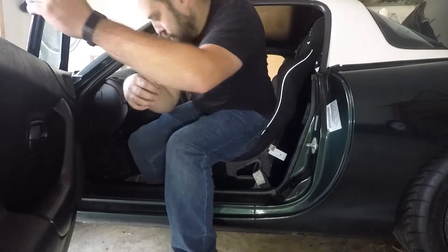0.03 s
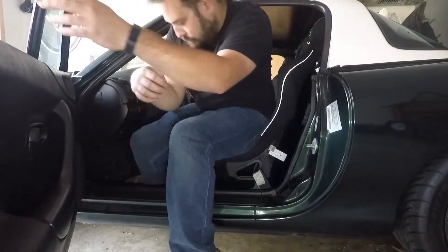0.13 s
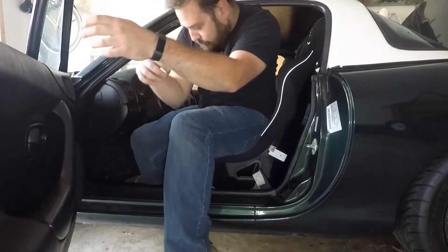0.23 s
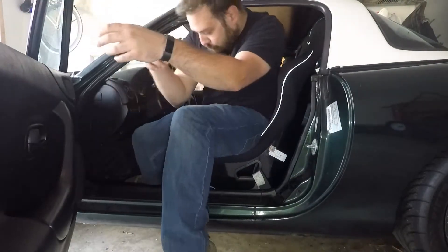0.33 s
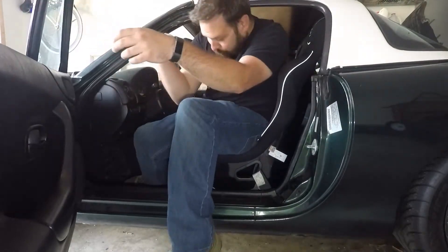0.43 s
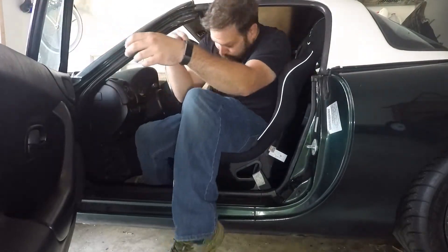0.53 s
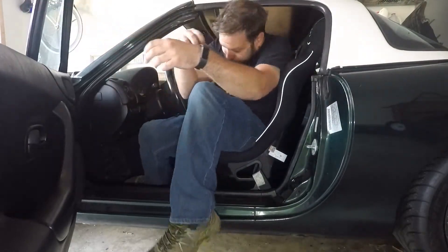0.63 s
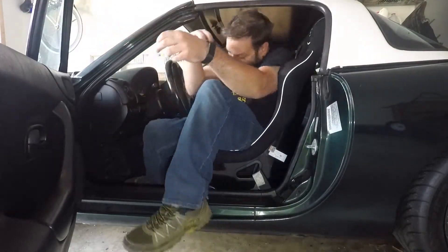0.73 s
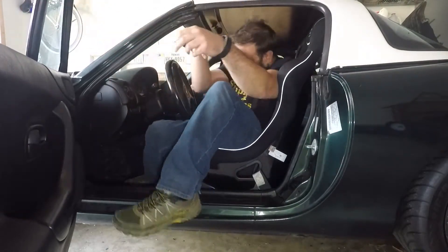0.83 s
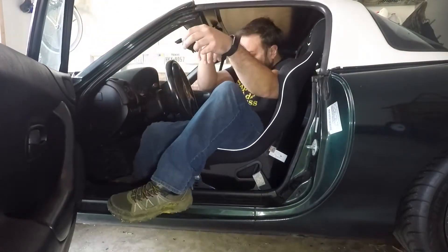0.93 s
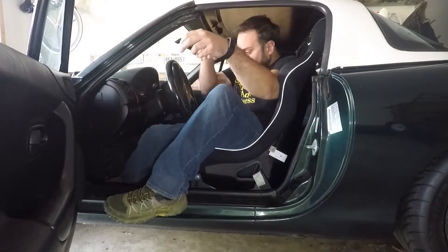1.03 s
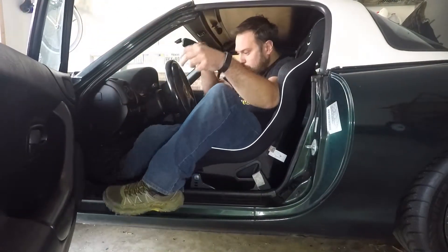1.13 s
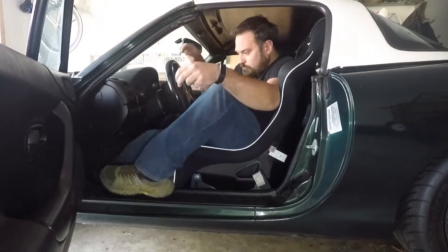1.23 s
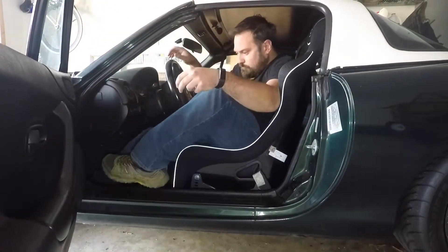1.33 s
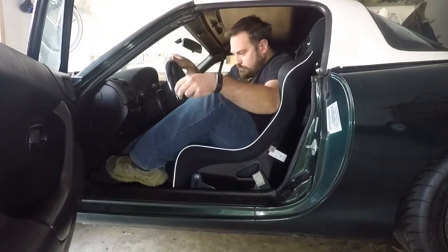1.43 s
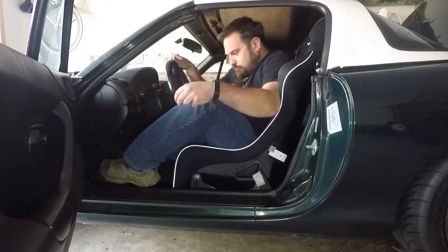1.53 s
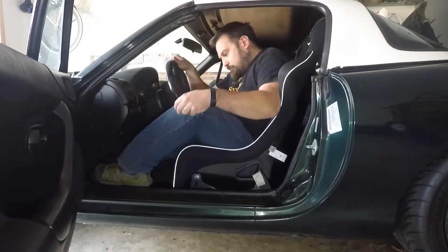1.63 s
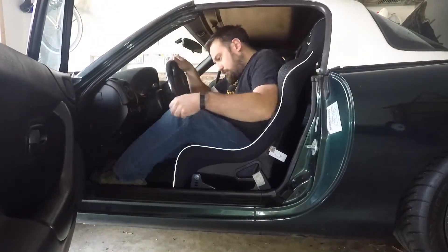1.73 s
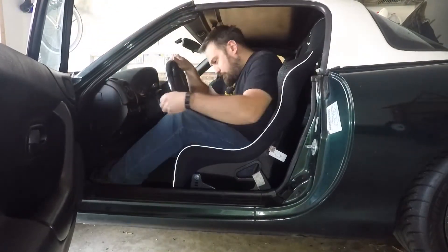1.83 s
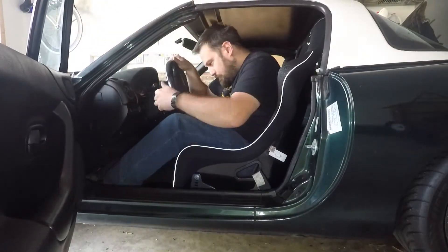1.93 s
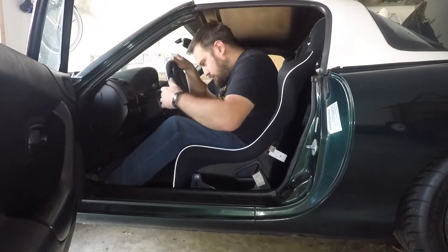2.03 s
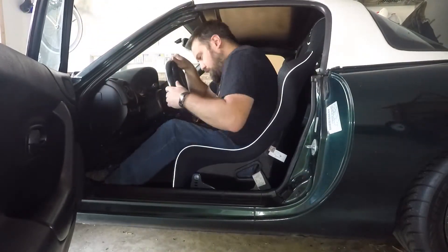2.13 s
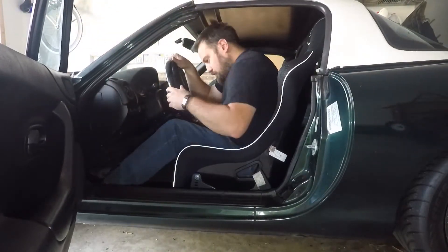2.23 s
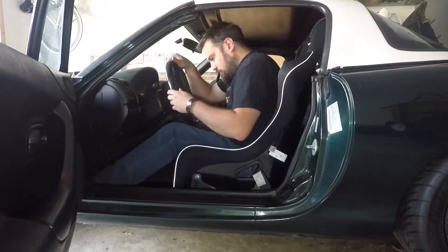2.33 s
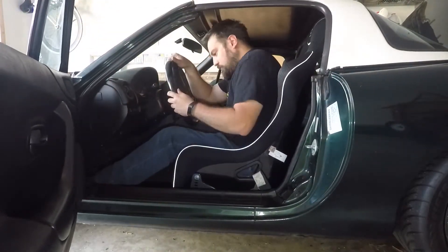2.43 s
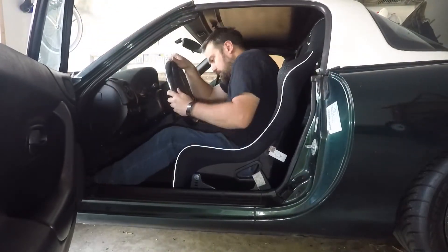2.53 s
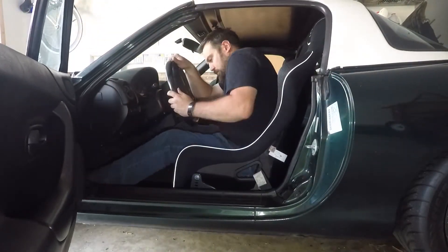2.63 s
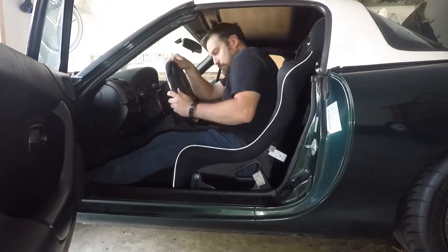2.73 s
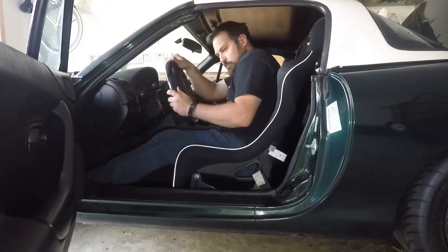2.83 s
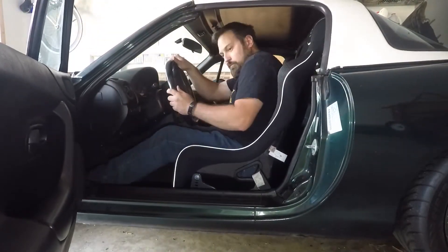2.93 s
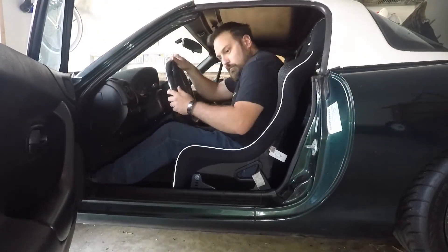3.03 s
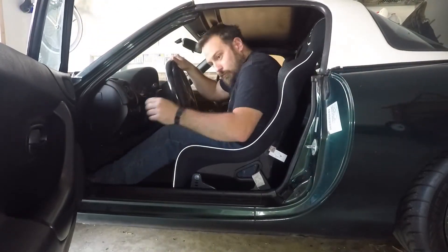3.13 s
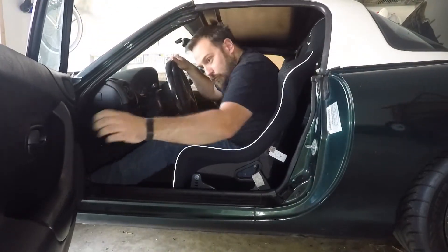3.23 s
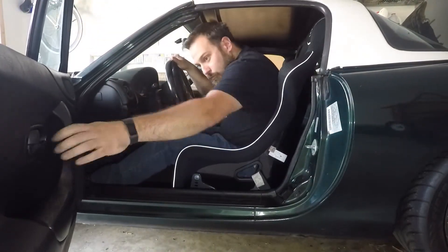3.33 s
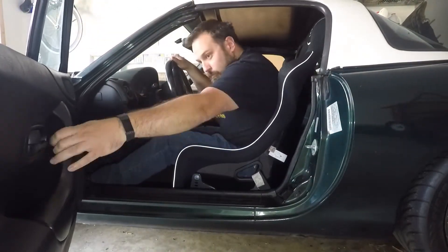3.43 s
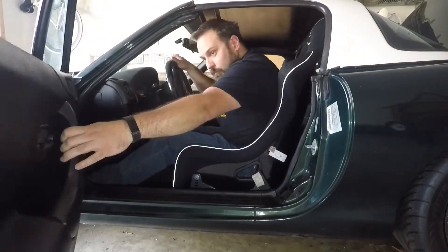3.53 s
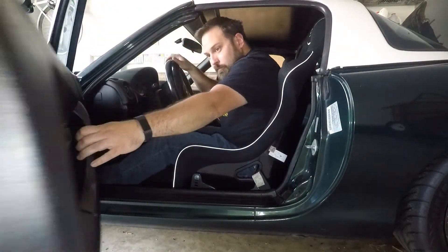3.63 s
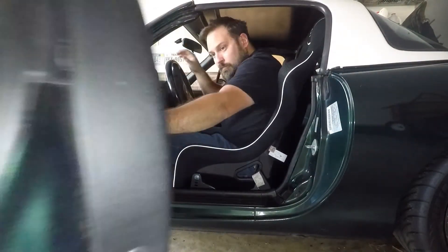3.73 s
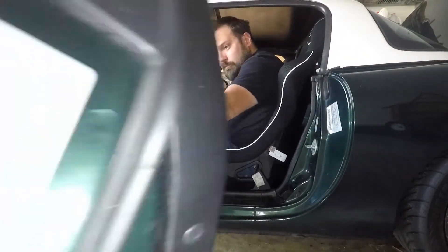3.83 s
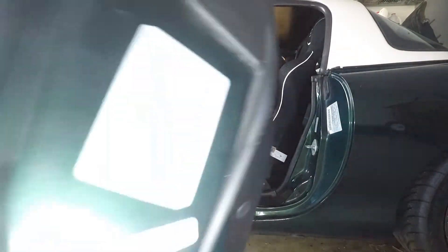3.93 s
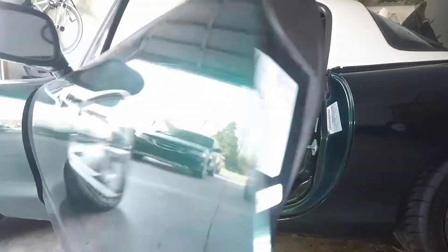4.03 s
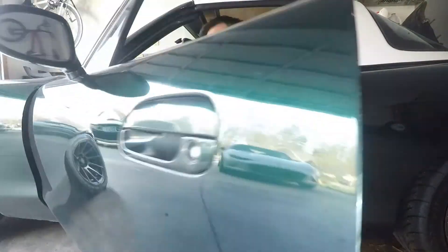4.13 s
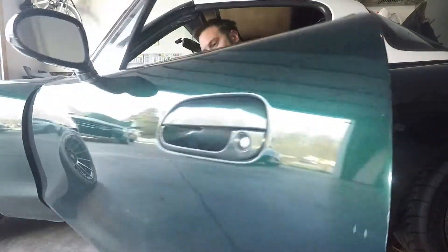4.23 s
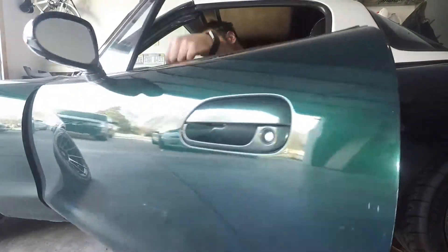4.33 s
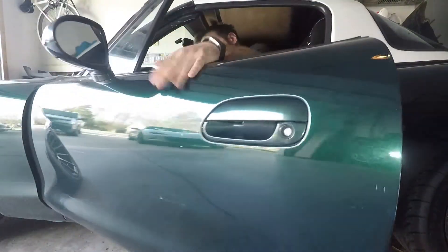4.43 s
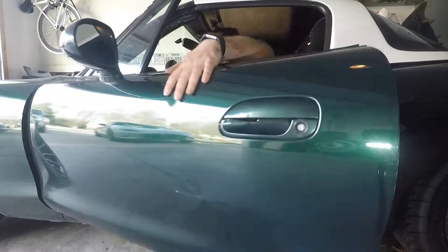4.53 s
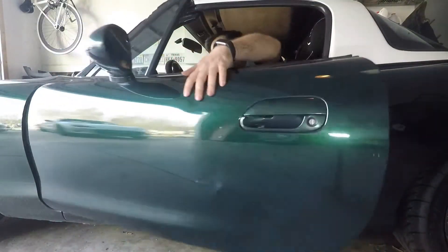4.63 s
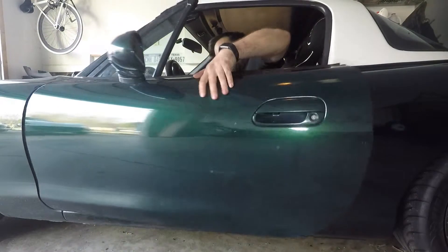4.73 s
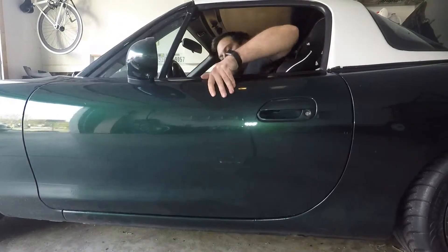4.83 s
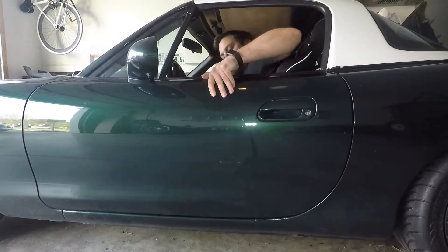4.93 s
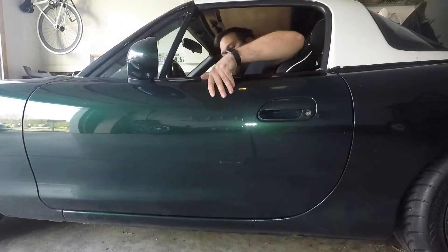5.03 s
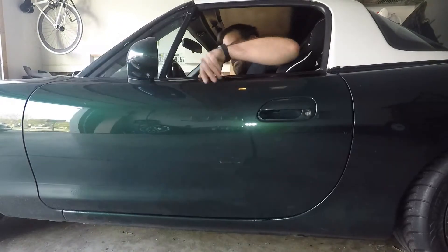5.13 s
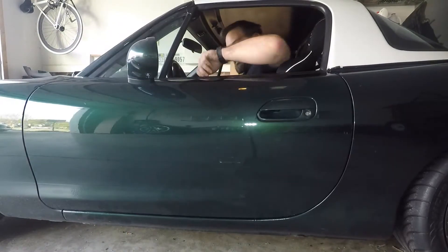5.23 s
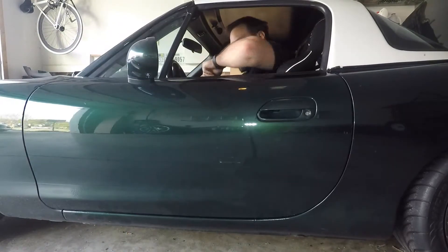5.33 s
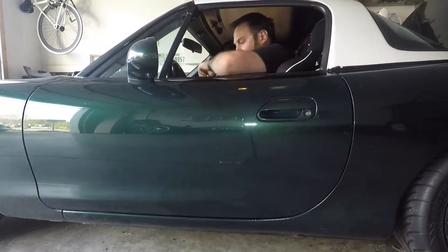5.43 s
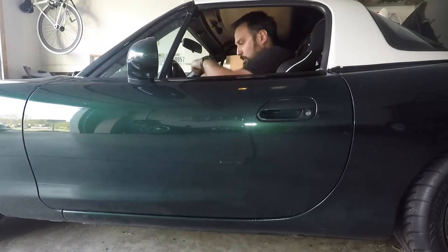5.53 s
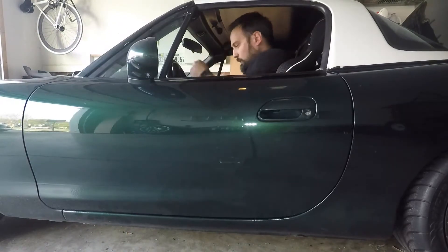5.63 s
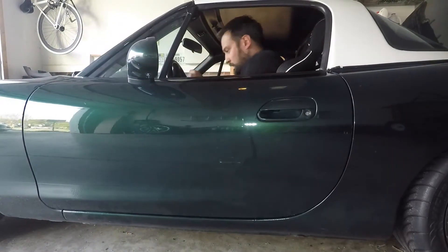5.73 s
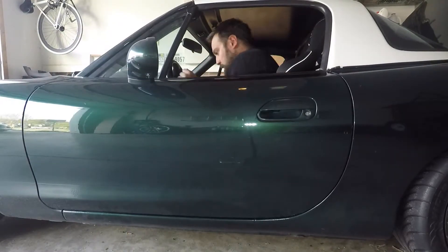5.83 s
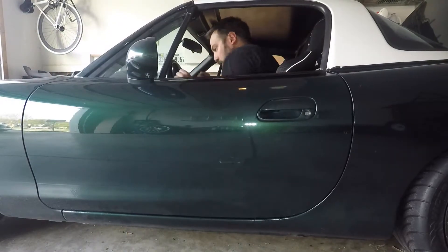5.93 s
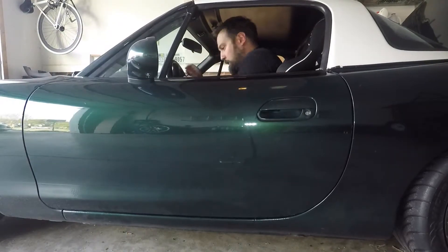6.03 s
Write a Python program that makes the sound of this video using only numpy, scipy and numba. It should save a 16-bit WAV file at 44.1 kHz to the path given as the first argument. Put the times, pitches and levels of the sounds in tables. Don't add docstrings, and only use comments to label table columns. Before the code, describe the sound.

In an open garage, a distant helicopter thumps and hums steadily under soft air hiss. Close by, a person slides into a car seat with cloth rustles, shoe scuffs, hollow knocks and small clicks. After a flurry of bright ticks, the door seal squeaks briefly and the door slams hard, metal rattling, with bare walls echoing. A small camera near the floor hears it in stereo.

```python
import sys
import numpy as np
from scipy import signal
from scipy.fft import rfft, irfft
from scipy.io import wavfile
from scipy.ndimage import uniform_filter1d
from numba import njit

SR = 44100
rng = np.random.default_rng(int(sys.argv[2]) if len(sys.argv) > 2 else 0)


def unload_audio(sound):
    columns = np.transpose(np.atleast_2d(sound))
    steps = np.round(np.clip(columns, -1, 1) * 32767)
    wavfile.write(sys.argv[1], SR, steps.astype(np.int16))


def convert_level_to_amplitude(level_db):
    exponent = np.asarray(level_db, float) / 20
    return 10 ** exponent


N = 267907
TIME = np.arange(N) / SR

# pitch_hz, side_minus_mid_db
PORT_SIDE = [(60, -24), (110, -7), (200, -11), (370, -7.5), (690, 4), (1270, 0.5), (2330, -1.5), (4290, -5),
             (7900, 2.5), (14500, -4.5)]


def on_log(table, hz):
    pitches, values = np.transpose(table)
    return np.interp(np.log(hz + 1), np.log(pitches), values)


def colour(x, table):
    hz = np.fft.rfftfreq(x.shape[-1], 1 / SR)
    return irfft(rfft(x) * convert_level_to_amplitude(on_log(table, hz)), x.shape[-1])


def band(x, lo_hz, hi_hz, order=2):
    y = signal.sosfilt(signal.butter(order, [lo_hz, hi_hz], "bandpass", fs=SR, output="sos"), x)
    return y / np.std(y)


def half_octaves(x):
    spectrum, hz = rfft(x), np.fft.rfftfreq(x.shape[-1], 1 / SR)
    for step in range(18):
        share = np.clip(1 - np.abs(2 * np.log2((hz + 1) / 40) - step), 0, 1)
        yield 40 * 2 ** (step / 2), irfft(spectrum * share, x.shape[-1])


def even(x):
    spectrum = rfft(x)
    width = int(160 * len(x) / SR)
    power = uniform_filter1d(np.abs(spectrum) ** 2, width)
    return irfft(spectrum / np.sqrt(power + 1e-12), len(x))


def walk(rate):
    k = int(SR / rate)
    held = np.repeat(rng.standard_normal(N // k + 1), k)
    drift = uniform_filter1d(uniform_filter1d(held, k), k)[:N]
    return drift / np.std(drift)


def diffuse(size, side_db):
    mid, side = rng.standard_normal((2, size))
    side = colour(side, side_db)
    return np.array([mid + side, mid - side])


def ports(x, pan_db, lag):
    return np.array([x * convert_level_to_amplitude(pan_db / 2), np.roll(x, lag) * convert_level_to_amplitude(-pan_db / 2)])


def near(hz, centre_hz, octaves):
    return 1 / (1 + (np.log2(hz / centre_hz) / octaves) ** 2)


def ring(modes, push_s, size):
    t = np.arange(size) / SR
    y = sum(g * np.sin(2 * np.pi * f * t) * np.exp(-np.log(1000) * t / t60) for f, g, t60 in modes)
    y = np.convolve(y, np.hanning(int(push_s * SR) + 3))[:size]
    return y / np.abs(y).max()


def add(out, x, s):
    i = int(s * SR)
    out[..., i:i + x.shape[-1]] += x[..., :N - i]


def strokes(rows):
    power = 0
    for s, swell, fade, db in rows:
        away = np.where(TIME < s, (s - TIME) / swell, (TIME - s) / fade)
        power = power + convert_level_to_amplitude(db - 20 * np.minimum(away, 9) ** 1.3) ** 2
    return power


def helicopter():
    # time_s, turns_hz
    shaft = [(0, 26.66), (1.5, 26.34), (2.4, 26.04), (3.4, 26.14), (4.4, 26.2), (6.07, 26.53)]
    # multiple_of_shaft, level_db
    orders = [(1, -45), (2, -16), (3, -21), (4, 0.5), (5, -25), (6, 1), (7, -14), (8, 5), (9, -9.5),
              (10, -33), (11, -37), (12, 1.5), (13, -16.5), (14, -12), (16, -11.5), (17, -17), (18, -27),
              (20, -17)]
    # time_s, low_lines_db, upper_lines_db
    hum = [(0, -51, -49.5), (.3, -46, -91), (0.58, -47.5, -84), (.7, -47, -55.5), (1, -42.5, -58),
           (1.4, -48.5, -59.5), (1.9, -49, -53), (2.3, -45.5, -53.5), (2.9, -46.5, -58), (3, -41, -51),
           (3.4, -46, -58), (3.799, -46, -60), (4.05, -49.5, -50), (4.5, -48.5, -48.5), (4.7, -46.5, -44.5),
           (5.3, -49, -49.5), (6.07, -45.5, -43.5)]
    # time_s, depth_db
    hum_fades = [(.39, -4.5), (0.601, -9.5), (.83, -4.5), (1.08, -8), (1.93, -2.5), (2.49, -4.5),
                 (2.72, -6), (3.08, -5.5), (3.28, -8), (5.37, -3.5), (5.569, -4.5)]
    blade_first_s, blade_period_s, fade_s = .0786, .10241, 0.0668

    count = int((N / SR - blade_first_s) / blade_period_s) + 1
    t = np.arange(-400, 2400) / SR
    push = np.exp(-(t / .0027) ** 2)
    pull = .55 * np.exp(-((t - .009) / .005) ** 2)
    blades = np.zeros(N)
    for k, db in enumerate(0.68 * rng.standard_normal(count)):
        add(blades, convert_level_to_amplitude(-29.0 + db) * (push - pull), blade_first_s + k * blade_period_s + t[0])

    turn = 2 * np.pi * np.cumsum(np.interp(TIME, *np.transpose(shaft))) / SR
    s, low_db, upper_db = np.transpose(hum)
    low = np.interp(TIME, s, low_db)
    for at, db in hum_fades:
        low = low + db * np.exp(-((TIME - at) / fade_s) ** 2)
    upper = np.interp(TIME, s, upper_db) + 3.5
    tail = 0
    for k, db in orders:
        level = db + (upper if 9.5 < k < 14.5 else low) + 1.82 * walk(4.853)
        tail = tail + convert_level_to_amplitude(level) * np.sin(k * turn + 0.57 * walk(3.16))

    rumble = convert_level_to_amplitude(-50.0 + 2 * walk(4.7)) * band(rng.standard_normal(N), 31, 110)
    return ports(blades + tail + rumble, 0., lag=5.3)


def air():
    # pitch_hz, level_db_per_hz
    hiss = [(76, -31), (130, -1), (214, -5.5), (266, -4.5), (331, -7.5), (411, -16), (875, -24),
            (1620, -24), (2510, -29), (3580, -27), (6500, -30), (10100, -39.5), (11300, -46.5),
            (14100, -49), (15200, -62)]
    # time_s, level_db
    swell = [(0, -2), (.15, 1.5), (.45, 1), (1.5, 1.5), (2.5, 3.5), (3.5, 3.5), (4.7, 4), (5.3, 1.5),
             (5.7, 5), (6.07, 3.5)]
    x = colour(diffuse(N, PORT_SIDE), hiss)
    return x / np.std(x) * convert_level_to_amplitude(-45 + np.interp(TIME, *np.transpose(swell)) + .5 * walk(2.72))


def insects():
    # peak_s, swell_s, fade_s, level_db, pitch_hz
    phrases = [(2.46, .15, .12, -52, 3130), (2.72, .08, .11, -56, 3050), (3.12, .15, .3, -57, 2900),
               (3.2, .2, .15, -58, 3300), (3.45, .3, .3, -59, 3250), (3.78, .4, .45, -57, 3290),
               (3.9, .28, .25, -59, 2890), (4.03, .6, .5, -58, 4740), (3.85, .3, .3, -60, 3720),
               (4.2, .3, .2, -59, 3650), (4.25, .3, .2, -61, 5850), (4.25, .25, .2, -59, 3230)]
    whine_hz, width_hz, waver = 9520, 200, .01
    out = convert_level_to_amplitude(-75) * band(diffuse(N, PORT_SIDE), .99 * whine_hz, 1.01 * whine_hz)
    for s, swell, fade, db, hz in phrases:
        sway = uniform_filter1d(rng.standard_normal((2, N)), int(SR / width_hz), axis=1)
        sway[1] = 0.67 * sway[0] + 0.64 * sway[1]
        pitch = hz * (1 + waver * walk(9))
        tone = np.sin(2 * np.pi * np.cumsum(pitch) / SR) * sway / np.std(sway)
        out = out + .9 * convert_level_to_amplitude(1.2 * walk(20)) * np.sqrt(strokes([(s, swell, fade, db)])) * tone
    return out


def rubbing():
    # peak_s, swell_s, fade_s, level_db, brightness_db_per_range
    scuffs = [(0.01, 0.37, 0.21, -46.5, -0.5), (.7, 0.36, 0.9, -60, -7.5), (.97, 0.18, 0.026, -55, -2),
              (1.17, 0.17, 0.17, -44.5, -1), (1.39, 0.14, 0.206, -50.5, -1), (1.6, 0.23, 0.18, -45.5, 0),
              (1.85, 0.092, 0.134, -47.5, -1.5), (2.06, 0.15, 0.16, -44, -1),
              (2.22, 0.076, 0.23, -50, -2.5), (2.64, 0.14, 0.23, -51, -6), (3.26, 0.14, 0.067, -51, -1.5),
              (3.36, 0.2, 0.108, -55.5, -7.5), (3.44, .1, 0.19, -54, 0), (4.376, 0.025, 0.136, -43.5, 2),
              (4.48, .1, 0.32, -55.5, 2), (4.735, 0.13, 0.04, -49.5, -0.5)]
    # peak_s, swell_s, fade_s, level_db
    seat = [(.84, 0.17, 0.29, -41.5), (1.24, 0.15, 0.088, -50), (2.06, .08, 0.108, -46),
            (2.14, 0.14, 0.14, -48), (3.25, 0.067, 0.11, -49), (3.35, .04, .08, -49),
            (3.42, 0.091, 0.088, -47), (4.71, .05, .06, -46), (.13, 0.13, 0.19, -55)]
    # peak_s, swell_s, fade_s, level_db
    cloth = [(.28, .4, 0.12, -51), (.52, 0.16, .15, -45.5), (.63, 0.3, 0.33, -39), (.87, 0.43, 0.22, -47.5),
             (2.06, 0.059, 0.13, -48), (2.33, 0.22, 0.23, -51), (2.66, 0.23, 0.17, -44.5),
             (2.85, 0.25, 0.11, -51.5), (3.16, 0.23, .15, -57)]
    # peak_s, swell_s, fade_s, level_db
    rustles = [
        (.56, 0.12, 0.29, -58),
        (.74, 0.33, 0.265, -41.5),
        (1.68, 0.25, 0.098, -52),
        (3.25, 0.077, 0.11, -50),
        (4.355, 0.067, .05, -47),
    ]
    # peak_s, swell_s, fade_s, level_db
    weave = [
        (.63, 0.23, 0.24, -42.5),
        (.87, .2, 0.22, -53),
        (2.33, 0.24, 0.16, -54),
        (2.66, 0.2, 0.28, -52),
    ]
    fidget = (-71.5, -67, -88, -67)
    unevenness = (3, 2, 1.5, 1.5)
    ranges_hz = [(250, 620), (720, 1340), (1400, 2005), (2200, 8150)]
    fidget_end_s = 4.2

    out, slides = 0, [0, strokes(seat), strokes(cloth), strokes(rustles)]
    for k, (lo, hi) in enumerate(ranges_hz):
        tilted = [(s, swell, fade, db + bright_db * (k - 3 / 2)) for s, swell, fade, db, bright_db in scuffs]
        gain = np.sqrt(strokes(tilted) + slides[k] + convert_level_to_amplitude(fidget[k]) ** 2 * (TIME < fidget_end_s))
        catches = np.minimum(rng.exponential(size=N), 8.0)
        grains = diffuse(N, PORT_SIDE) * convert_level_to_amplitude(unevenness[k] * catches + 1.26 * walk(90))
        out = out + band(grains, lo, hi, order=3) * gain * convert_level_to_amplitude(0.5)
    return out + band(diffuse(N, PORT_SIDE), 1900, 3700) * np.sqrt(strokes(weave))


def garage(x):
    # pitch_hz, t60_s
    decay = [(60, 0.48), (200, 0.62), (500, 0.98), (1300, 1.137), (1900, 1.03), (2500, 1.05), (3500, 0.91),
             (6000, 0.76), (9000, 0.78), (13000, 0.37)]
    # pitch_hz, side_minus_mid_db
    echo_side = [(60, -32), (110, -33), (200, -28), (370, -18.5), (690, -2), (1270, 1), (2330, -1.5),
                 (4290, -8.5), (7900, 4), (14500, 2.5)]
    t = np.arange(int(1.3 * SR)) / SR
    echo = 0
    for hz, part in half_octaves(diffuse(len(t), echo_side)):
        echo = echo + part * np.exp(-np.log(1000) * t / on_log(decay, hz))
    echo = echo * (1 - np.exp(-t / 0.0037))
    return signal.fftconvolve(x[None], echo / np.sqrt(np.sum(echo ** 2) / 2), axes=1)[:, :N]


def touch(t, bounce_s, share=.26):
    return (t == 0) + share * rng.standard_normal(len(t)) * np.exp(-t / bounce_s)


def knocks():
    # pitch_hz, t60_s
    cabin = [(155, 0.065), (185, 0.11), (215, 0.065), (250, 0.13), (300, 0.029), (365, 0.081), (440, 0.031),
             (530, 0.0865), (640, 0.079)]
    # time_s, thud_db, trim_knock_db, thud_hz
    thuds = [(0.05, -44.5, -35, 219), (0.272, -43, -44, 214), (0.759, -35, -35, 210),
             (0.799, -34.5, -33, 284), (1.157, -27.5, -30.5, 241), (1.174, -23, -28.5, 212),
             (1.581, -23.5, -35, 212), (1.587, -30, -28, 196), (1.799, -30, -38, 241.4),
             (1.825, -29.5, -40, 239), (1.839, -31.5, -29.5, 236), (2.05, -48, -32, 500),
             (2.091, -36.5, -34, 403), (2.174, -27, -35.5, 336), (2.234, -34, -36, 217),
             (2.29, -37, -51, 243), (2.558, -30.5, -33.5, 417), (2.614, -25.5, -36, 450),
             (2.655, -26, -50, 169), (2.69, -28.5, -40, 160), (2.731, -36, -49, 154),
             (3.238, -40, -33, 307), (3.343, -28, -31.5, 204), (3.726, -32.5, -61, 221),
             (4.36, -34.5, -42, 362), (4.372, -23.5, -29, 170), (4.385, -37, -52, 510),
             (4.41, -30.5, -52, 356), (4.705, -31, -45, 205)]
    # time_s, click_db, trim_knock_db, click_hz
    ticks = [(.759, -35, -60, 4700), (0.048, -44, -60, 3500), (0.995, -39, -43, 4200),
             (1.165, -33, -47, 5000), (1.177, -37, -60, 3570), (1.581, -29, -60, 2970),
             (1.588, -24, -41, 3430), (1.839, -28, -53, 3430), (2.615, -39, -38, 1900),
             (2.127, -38, -40, 2500), (3.239, -35, -58, 4930), (3.342, -34, -32, 4800),
             (3.3658, -32, -30.5, 5030), (3.411, -36, -40, 5600), (3.421, -28.5, -26, 4230),
             (3.605, -33, -54, 4800), (4.320, -36, -56, 4650), (4.361, -27, -60, 5640),
             (4.372, -35, -60, 4500), (4.387, -36, -60, 4500), (4.41, -49, -62, 4000)]
    # time_s, level_db, pitch_hz, t60_s
    pings = [(3.239, -34, 6000, .012), (3.239, -38, 3300, .012), (3.422, -34, 3570, 0.018),
             (3.274, -37, 4600, 0.018), (3.311, -36, 5900, .012), (3.325, -28, 8300, 0.017),
             (3.342, -25.5, 4040, 0.02), (3.3421, -26, 5730, 0.017), (3.358, -27, 8800, 0.016),
             (3.3592, -29, 10100, .015), (3.3652, -26.5, 5580, 0.025), (3.411, -38, 4540, 0.011),
             (3.412, -30, 6900, .02), (2.56, -47, 4740, .02), (4.358, -31, 5540, .03),
             (1.588, -31.5, 5970, 0.022), (1.84, -35, 5940, .015)]
    mono, t = np.zeros(N), np.arange(6000) / SR

    def peak(x):
        return x / x.max()

    for s, thud_db, knock_db, hz in thuds:
        modes = [(f, (-1) ** k * near(f, hz, 0.54), t60) for k, (f, t60) in enumerate(cabin)]
        knock = peak(band(touch(t, 0.0089, 0.34), 400, 1620))
        add(mono, convert_level_to_amplitude(thud_db) * ring(modes, 0.0016, len(t)) + convert_level_to_amplitude(knock_db) * knock, s)
        slap = peak(band(touch(t, 0.019, .9), 530, 5800))
        add(mono, convert_level_to_amplitude(knock_db - 10.5) * slap, s)
    for s, click_db, knock_db, hz in ticks:
        click = band(even(touch(t, 0.004, 0.32)), hz * 0.58, min(hz * 1.314, 11000), order=3)
        knock = band(touch(t, 0.0059), 430, 1506)
        add(mono, convert_level_to_amplitude(click_db) * peak(click) + convert_level_to_amplitude(knock_db) * peak(knock), s)
    for s, db, hz, t60 in pings:
        modes = [(hz * .96, .6, t60), (hz, 1, t60), (hz * 1.045, .7, t60)]
        add(mono, convert_level_to_amplitude(db) * ring(modes, 0, len(t)), s)
    return ports(mono, 1.3, lag=1) + convert_level_to_amplitude(-5) * garage(mono)


def seal():
    # peak_s, swell_s, fade_s, level_db
    squeaks = [
        (4.68, 0.023, 0.033, -49),
        (4.705, 0.023, 0.032, -46),
    ]
    turn = 2 * np.pi * np.cumsum(1104 * (1 + 0.036 * walk(250))) / SR
    x = (np.sin(turn) + convert_level_to_amplitude(-6) * np.sin(2 * turn)) * convert_level_to_amplitude(4.3 * walk(200))
    return ports(x * np.sqrt(strokes(squeaks)), -0.81, lag=2.4)


def patchy(x):
    # pitch_hz, left_minus_right_db
    echo_pan = [(60, -0.5), (110, 0), (200, 1), (370, 2), (690, 1.5), (1270, -4.5), (2330, 0), (4290, -2),
                (7900, 1), (14500, -3.5)]
    i = int(4.7 * SR)
    out = 0
    for hz, part in half_octaves(x[:, i:]):
        lean = on_log(echo_pan, hz) * np.array([[.5], [-.5]])
        out = out + part * convert_level_to_amplitude(1.2 * walk(45)[i:] + lean)
    return np.pad(out, ((0, 0), (i, 0)))


def slam():
    # time_s, panel_db, metal_db, burst_s, panel_hz
    blows = [(4.742, -14, -35, 0.022, 203), (4.7527, -12, -6, 0.0011, 200),
             (4.7551, -13.5, -0.5, 0.0094, 258), (4.7607, -3, -6.5, 0.012, 167),
             (4.767, 7, -6.5, 0.0024, 173.5), (4.779, -3.5, -6.5, 0.0047, 245), (4.793, 1, -8, 0.011, 244),
             (4.811, 1.5, -10.5, 0.019, 284), (4.826, -9, -19, 0.008, 250), (4.84, -11.5, -15, 0.031, 315),
             (4.856, -19, -20, 0.01, 180), (4.873, -9, -17.5, 0.066, 240), (4.91, -12, -16.5, 0.012, 527),
             (4.928, -15, -21, 0.01, 240), (4.945, -9.5, -18.5, 0.0086, 302), (4.96, -17, -22, 0.012, 417),
             (4.995, -24, -25.5, 0.012, 320)]
    # pitch_hz, level_db, t60_s
    door = [(136.5, 2.5, 0.178), (178.2, 6, 0.15), (208.5, -10, 0.3), (247, 10.5, 0.13), (296, -5, 0.2),
            (309.7, 2.5, 0.24), (345, -14, 0.17), (415, -29, 0.18), (441, -2, 0.31), (501, 1, 0.2),
            (592, 7, 0.19), (710, -14, .2)]
    # pitch_hz, level_db_per_hz
    metal_tone = [(240, -1), (400, -3), (570, -3.5), (722, -7.5), (893, -8.5), (1300, -6), (1800, -9),
                  (2430, -15.5), (3340, -18.5), (6120, -26.5), (8000, -21), (10700, -63.5), (13100, -55),
                  (15000, -78)]
    # pitch_hz, level_db, t60_s
    sheet = [(471, -2, 0.44), (520, -12, 3.4), (547, -5, 2.2), (717, -8, 1.4), (1030, -38.5, 5.0),
             (1110, -3, 1.2), (1287, -12, 1.0), (1330, -31, 0.88), (1530, -29, 1.1), (1610, -10, 0.8),
             (1750, -24, 0.86), (3200, -20, 0.73), (3300, -20, 0.96), (3540, -15, 0.64)]
    # pitch_hz, level_db, t60_s
    boom = [(38.5, -9.5, 1.17), (44, -4, 0.47), (64, -24, 0.26), (86.2, 2, 0.37)]
    # time_s, level_db
    boom_hits = [
        (4.758, -24),
        (4.838, -10),
    ]
    # time_s, level_db
    snaps = [
        (4.7525, -17.5),
        (4.754, -21),
        (4.7604, -14),
        (4.768, -22),
        (4.779, -27),
    ]
    rattle_attack = 0.19
    panel_wet_db, slam_wet_db, latch_wet_db = -7, 1.5, -6
    (panel, latch), rattle, t = np.zeros((2, N)), np.zeros((2, N)), np.arange(SR) / SR

    for s, db in boom_hits:
        add(panel, convert_level_to_amplitude(db) * ring([(f, convert_level_to_amplitude(g), t60) for f, g, t60 in boom], 0.014, len(t)), s)
    for k, (s, panel_db, metal_db, burst_s, panel_hz) in enumerate(blows):
        noise = rng.standard_normal((2, len(t)))
        fade = np.exp(-t / max(burst_s, 1e-3)) * (1 - np.exp(-t / (rattle_attack * burst_s)))
        modes = [(f, convert_level_to_amplitude(g) * near(f, panel_hz, 0.51), t60) for f, g, t60 in door]
        add(panel, convert_level_to_amplitude(panel_db) * ring(modes, 0.0016, len(t)), s)
        metal = colour(even(noise[0] * fade), metal_tone) * (t < .5)
        metal = metal * np.sqrt(np.sum(fade ** 2) / np.sum(metal ** 2))
        add(rattle[k % 2], convert_level_to_amplitude(metal_db) * metal, s)
        add(latch, convert_level_to_amplitude(metal_db - 14) * band(noise[1], 3430, 7700) * fade, s)
    for s, db in snaps:
        add(latch, convert_level_to_amplitude(db) * band(rng.standard_normal(len(t)), 2500, 7700) * np.exp(-t / 0.0031), s)
    glass = band(rng.standard_normal(len(t)), 11800, 13900) * np.exp(-np.log(1000) * t / 0.33)
    add(latch, convert_level_to_amplitude(-29) * glass, 4.755)

    sheet_ring = ring([(f, convert_level_to_amplitude(g), min(t60, .5)) for f, g, t60 in sheet], 0, SR // 2)
    skin = signal.fftconvolve(rattle[0], sheet_ring)[:N]
    rattle[0] += convert_level_to_amplitude(-17) * skin * np.std(rattle[0]) / np.std(skin)

    first_echo = garage(convert_level_to_amplitude(panel_wet_db) * panel + convert_level_to_amplitude(slam_wet_db) * rattle[0])
    second_echo = garage(convert_level_to_amplitude(slam_wet_db) * rattle[1] + convert_level_to_amplitude(latch_wet_db) * latch)
    direct = ports(panel, .3, lag=2) + ports(rattle.sum(axis=0), -1.77, lag=2.8) + ports(latch, .4, lag=0.97)
    return direct + patchy(first_echo + second_echo)


def scene():
    # pitch_hz, level_db
    housing = [(6500, -0.5), (7600, -12), (9000, -8.5), (11000, -14), (15000, -20)]
    return helicopter() + air() + insects() + colour(rubbing() + knocks() + seal() + slam(), housing)


def wind_filter_db():
    # start_s, opening_s, bass_let_through_db, creep_db_per_s
    opens = [
        (1.51, 0.37, -50, -9.5),
        (4.745, 0.037, -48, 10),
    ]
    shut = -78 + 2 * TIME
    db = shut
    for s, opening_s, open_db, creep in opens:
        swing = np.clip((TIME - s) / opening_s, 0, 1)
        target = open_db + creep * np.maximum(TIME - s - opening_s, 0)
        db = np.maximum(db, shut + swing * (target - shut))
    return np.minimum(db, -39)


@njit
def follow(x, attack, release):
    e, y = 0., np.empty(len(x))
    for i in range(len(x)):
        e += (x[i] - e) * (attack if x[i] > e else release)
        y[i] = e
    return y


def band_limit(x):
    return signal.sosfilt(signal.butter(12, 15130, fs=SR, output="sos"), x)


def record(dry):
    wind_hz, bass_open_db, duck_db, top_hz = 139, -43, -32, 15100
    hz = np.fft.rfftfreq(N + 2 * SR, 1 / SR)
    padded = np.pad(dry, ((0, 0), (SR, SR)), "reflect", reflect_type="odd")
    bass = irfft(rfft(padded) / (1 + (hz / wind_hz) ** 16), N + 2 * SR)[:, SR:-SR]
    x = dry + bass * (convert_level_to_amplitude(wind_filter_db() - bass_open_db) - 1)
    loud = follow(np.abs(x).max(axis=0), 1 / (0.0017 * SR), 1 / (.3 * SR))
    x = x * np.minimum(1, convert_level_to_amplitude(duck_db) / (loud + 1e-9)) ** 0.081
    x = np.tanh(x * 1.05) / 1.05
    x = signal.sosfilt(signal.ellip(8, .2, 70, top_hz, fs=SR, output="sos"), x)
    x = x * np.minimum(1, TIME / .005)
    return band_limit(x)


dry = scene()
out = record(dry)
unload_audio(out)
```